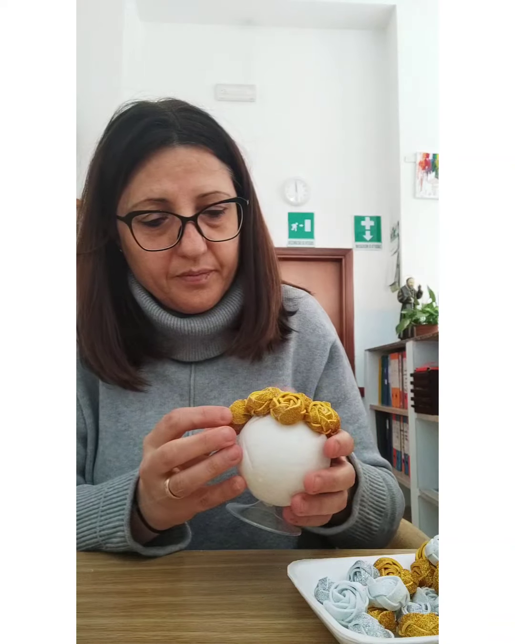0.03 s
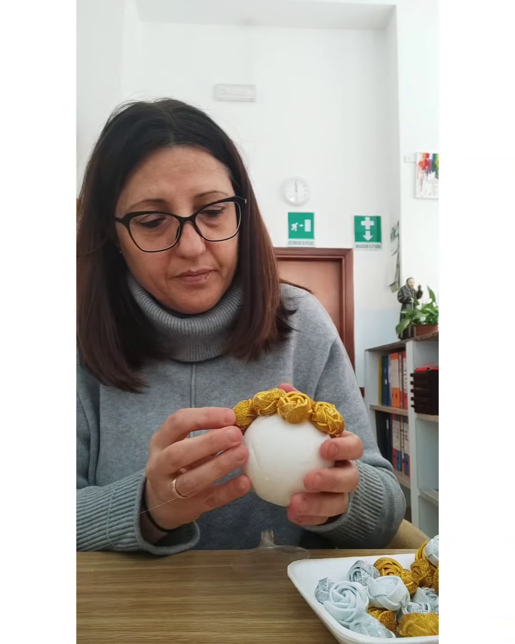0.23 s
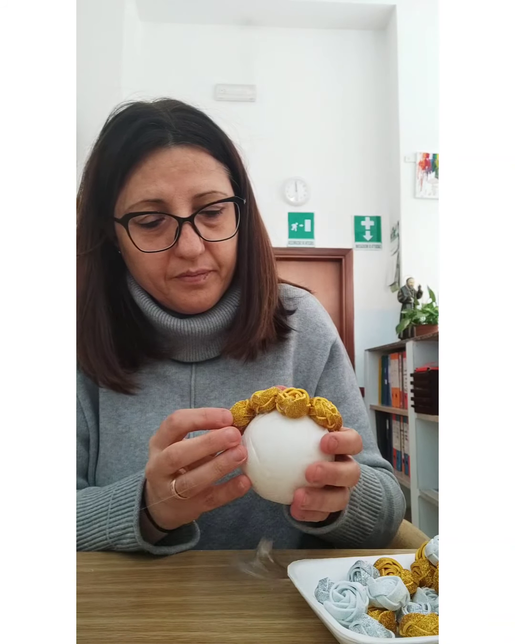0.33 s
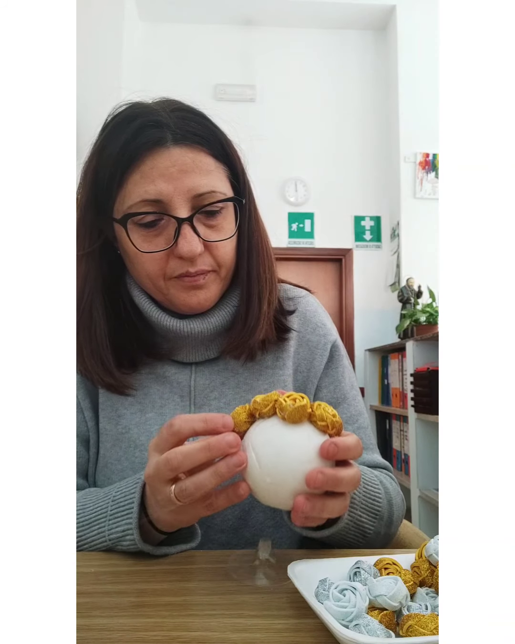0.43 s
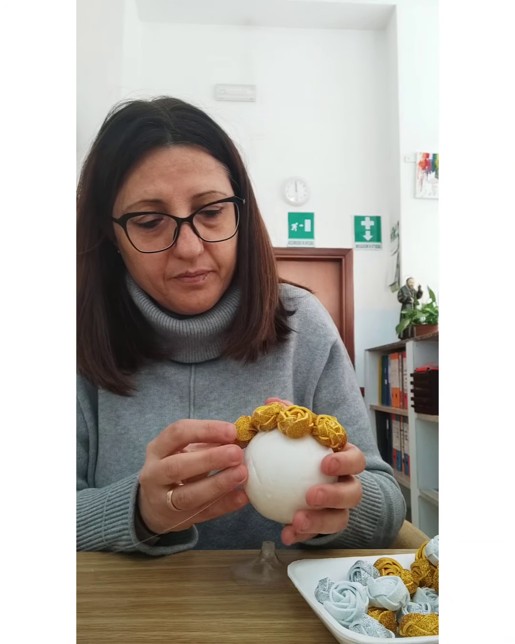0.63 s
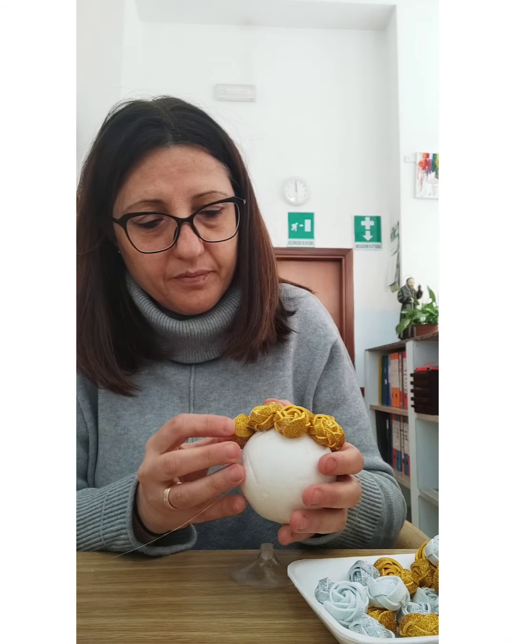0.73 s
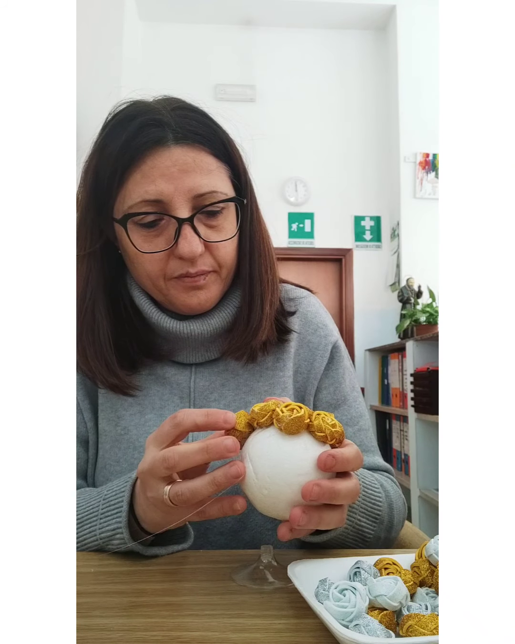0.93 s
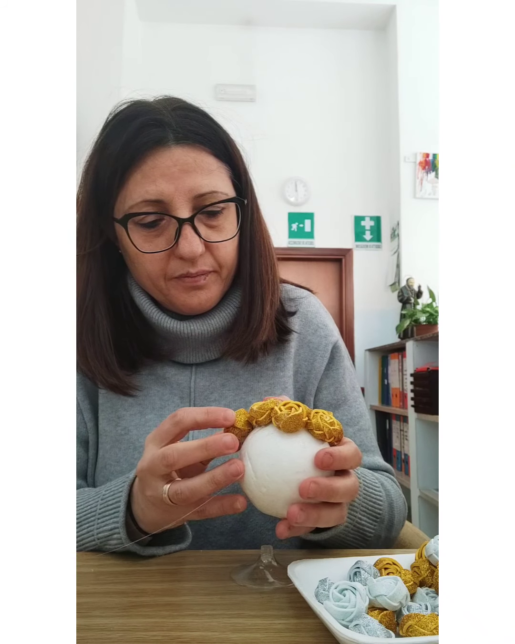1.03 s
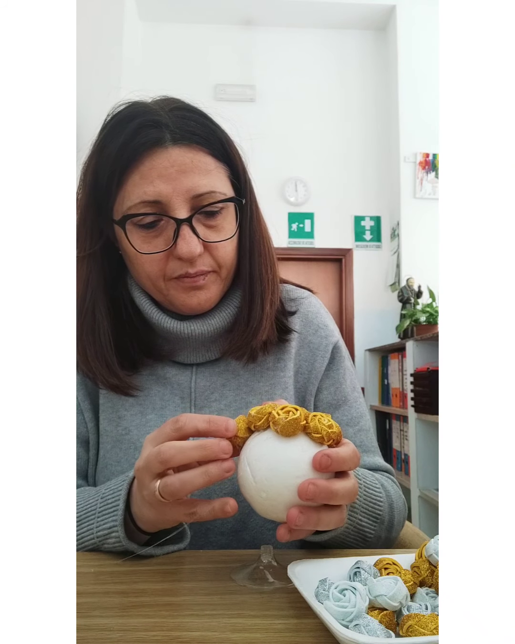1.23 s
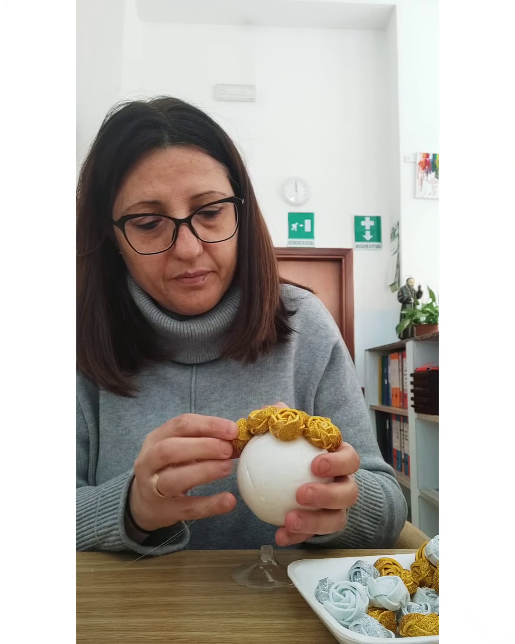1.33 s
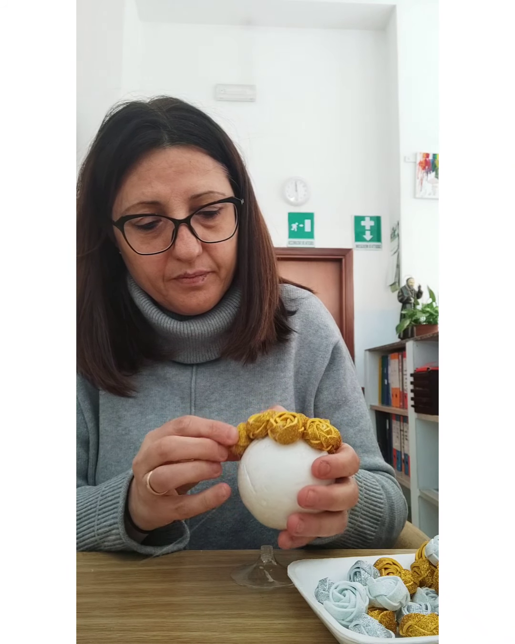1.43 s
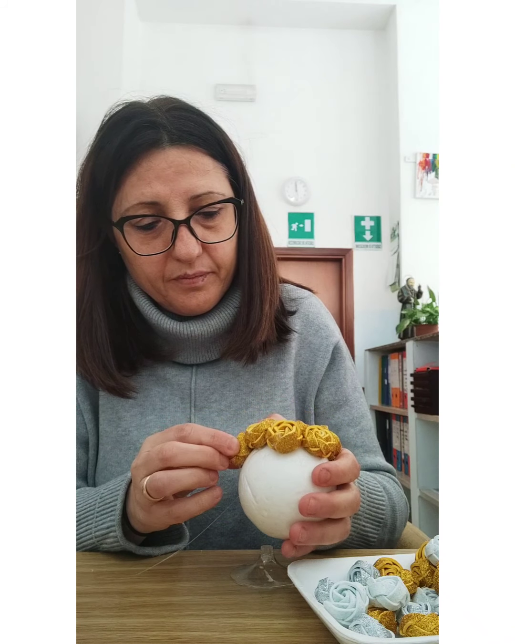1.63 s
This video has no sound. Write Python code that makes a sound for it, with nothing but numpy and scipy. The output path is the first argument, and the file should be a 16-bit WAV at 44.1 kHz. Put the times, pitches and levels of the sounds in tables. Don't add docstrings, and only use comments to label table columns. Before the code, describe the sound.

After barely audible finger strokes, a hard glass-on-wood knock leads into a stuttering, bright scrape with small thumps, ending in a hollow scuff; the echo fades into quiet room air with tiny ticks, heard close up in stereo.

```python
import sys
import numpy as np
from scipy import signal
from scipy.io import wavfile
from scipy.ndimage import uniform_filter1d

SR = 44100
rng = np.random.default_rng(int(sys.argv[2]) if len(sys.argv) > 2 else 0)


def to_wav(s):
    ch = np.atleast_2d(s).T
    pcm = np.round(np.clip(ch, -1, 1) * 32767)
    wavfile.write(sys.argv[1], SR, pcm.astype(np.int16))


def natural_amplitude(level_db):
    exponent = np.asarray(level_db, float) / 20
    return 10 ** exponent


N = 74970

# (time [s], peak [dB], low glass modes [dB], table thud [dB], left-right [dB])
FOOT_KNOCKS = [(.2341, -20, -7, 12.5, 4), (0.2586, -4.5, -25, -2.5, -4), (.2615, -4, -11, -2.5, 0),
               (0.2874, -11.5, -9, -7.5, -9), (.362, -17, -15, -1, -9), (.376, -14, 9, -5.5, 5.5),
               (.383, -11.5, 8.5, -8, -15.5), (0.396, -25, 3.5, -34, -32.5), (0.478, -32, 9, 1, -4),
               (.484, -28.5, 4, 0.5, -12), (.498, -18.5, -27.5, -1, 6.5), (0.5809, -28.5, 9, -4.5, 7),
               (.59, -18, 10, -9, -2.5), (.6259, -18.5, 1.5, -10, 7.5), (0.6646, -18, 7.5, -3, 3.5),
               (0.676, -24, 10.5, -13, 13.5), (0.6888, -14, -10.5, -20, -6), (.703, -25.5, 2.5, -3.5, 2.5),
               (.713, -20, -1, -12.5, 6), (0.718, -17.5, 9.5, -9, 2), (.727, -18.5, 9, 0, 1),
               (0.7332, -11.5, 6, -10, 1.5), (0.7443, -23, 6.5, -15, 9), (0.751, -18.5, 6, 0, 0.5),
               (0.7631, -31, 17, -15.5, 3), (0.77, -21, 10.5, -11, 9), (0.7931, -17.5, -28, -3, 2.5),
               (.825, -17.5, -3, -18, 5), (0.8497, -10, -10, -9, -4.5), (0.8864, -18, -7, -7, 3),
               (0.899, -19.5, 1, -16, 7), (0.911, -15.5, 7.5, -6.5, -3.5), (.917, -17.5, 8, -3, -2.5),
               (0.935, -15.5, 8.5, -10.5, -5.5), (.953, -11.5, -31, -15, 5.5)]
BAND_EDGES = 18 * 2 ** np.arange(0, 10.1, .4)


def stand():
    # (frequency [Hz], width [Hz], depth [dB])
    gaps = [(3640, 240, -40), (4070, 340, -45), (8590, 740, -60), (11100, 240, -35), (12250, 700, -35),
            (14800, 800, -55)]
    slips, rumble, grip = drag()
    out = glass(slips, grip) + scrape(slips, rumble)
    for hz, width_hz, depth_db in gaps:
        out = notch(out, hz, width_hz, depth_db)
    out = out + crack() + table_top(rumble)
    return butter(out, 3, 139, "high")


def drag():
    # (time [s], level [dB], low glass modes [dB])
    pressure = [(0.269, -35, 0), (0.346, -50, 10), (.376, -22.5, 0), (0.387, -29, -1), (.41, -40, 8),
                (0.465, -44.5, 2), (0.484, -31, 8.5), (0.502, -31, 2.5), (0.549, -39, 1), (0.588, -29, 5.5),
                (0.611, -35.5, 7), (.67, -29, -4), (0.731, -34.5, 9), (0.792, -33, 1), (0.893, -31.5, 6.5),
                (.955, -36, 0), (.99, -40, -23), (1.037, -54.5, -10.5)]
    chatter_per_s, chatter_db, sides_alike = 165, 3.5, 0.49
    t = np.arange(N) / SR
    s, press_db, grip_db = np.transpose(pressure)
    press = natural_amplitude(np.interp(t, s, press_db)) * (t > s[0]) * (t < s[-1])
    grip = natural_amplitude(np.interp(t, s, grip_db))
    cycle = np.cumsum(chatter_per_s * (1 + .18 * drift(11.0))) / SR % 1
    left, other = [grains(2700, spread=2.8) for _ in range(2)]
    right = sides_alike * left + np.sqrt(1 - sides_alike ** 2) * other
    slips = press * natural_amplitude(chatter_db * (1 - 2 * cycle)) * np.array([left, right])
    smooth_press = np.abs(uniform_filter1d(press, size=1500))
    rumble_level = np.minimum(natural_amplitude(-31.5), np.sqrt(press * smooth_press))
    return slips, rumble_level * rng.standard_normal(N), grip


def glass(slips, grip):
    # (frequency [Hz], level [dB], t60 [s], left-right [dB])
    glass_modes = [(2273, -2, 0.011, 14.5), (2421, 0.5, 0.013, 11.5), (2530, -2, 0.013, 13.5),
                   (3030, -9.5, 0.03, 8.5), (3331, -18, 0.058, 6), (6308, 0, 0.03, 4),
                   (6750, -8, 0.032, 6.5), (7660, -3.5, 0.0057, -21), (8010, -5.5, .042, 9),
                   (2970, -10.5, 0.045, 10), (10500, -31.5, 0.032, 10), (11856, -30, 0.03, 16),
                   (13800, -24, .005, 16), (16000, -17, .01, 20.5)]
    low_db = np.array(FOOT_KNOCKS)[:, 2]
    luck_db = rng.normal(0, 0.63, (len(FOOT_KNOCKS), len(glass_modes)))
    out = 0
    for k, (hz, db, t60, side_db) in enumerate(glass_modes):
        low_share = 1 if hz < 2800 else 0.64 if 2800 < hz < 4000 else 0
        hits = knock_train(luck_db[:, k] - 7.0 + low_share * low_db)
        rub = 0.098 * slips * natural_amplitude(4 * drift(29.8))
        if hz < 4000:
            rub = rub * grip
        out = out + (-1) ** k * natural_amplitude(db) * pan(side_db) * ring(hits + rub, hz, t60)
    return butter(out, 2, 1700, "high")


def scrape(slips, rumble):
    # (frequency [Hz], level per hertz [dB])
    scrape_colour = [(90, -28.5), (170, 9.5), (320, 6.5), (800, 0.5), (1400, -1.5), (2300, 6), (4700, -4),
                     (7500, 6.5), (9600, -9), (16000, -13)]
    # (frequency [Hz], left-right [dB])
    scrape_balance = [(60, 2.5), (180, 3.5), (550, 17.5), (1650, -2), (4970, 10), (15000, 14)]

    def friction(hz):
        return slips if hz > 1200 else rumble
    return natural_amplitude(1.1) * colour(friction, scrape_colour, scrape_balance, patchy_db=3.0)


def crack():
    # (frequency [Hz], level per hertz [dB])
    crack_colour = [(150, -43.5), (500, -9.5), (1300, 4.5), (2500, 2.5), (5000, 3), (8000, -1),
                    (11000, -20), (16000, -20.5)]
    decay_s = 0.0016
    thud_db = np.array(FOOT_KNOCKS)[:, 3]
    burst = np.exp(-np.arange(2000) / SR / decay_s) * rng.standard_normal(2000)
    bursts = natural_amplitude(-4.5) * signal.fftconvolve(knock_train(thud_db), burst[None])[:, :N]
    balance = [(500, 13.0), (8000, 1.5), (13000, 14)]
    return colour(lambda hz: bursts, crack_colour, balance, patchy_db=2.5)


def table_top(rumble):
    # (frequency [Hz], level [dB], t60 [s])
    wood_modes = [(235, -16, 0.03), (489, -9.5, 0.021), (656, -14.5, 0.025), (882, -9, 0.05),
                  (1150, -6, 0.011), (1403, -6, 0.025), (1871, 0.5, 0.022), (2096, -1, 0.026)]
    lag_s = 0.00509
    thud_db = np.array(FOOT_KNOCKS)[:, 3]
    spot_db = rng.normal(0, 4.3, (len(FOOT_KNOCKS), len(wood_modes)))
    out = 0
    for k, (hz, db, t60) in enumerate(wood_modes):
        force = knock_train(thud_db + spot_db[:, k]) + natural_amplitude(-34) * rumble
        push = signal.lfilter([.06], [1, -.94], force)
        late = np.roll(push, int(lag_s * SR * np.sqrt(300 / hz)), axis=1)
        swell = ring(late, hz, 0.0093) * 0.021
        out = out + pan(3.5) * natural_amplitude(db) * ring(swell, hz, t60)
    return out


def knock_train(extra_db):
    s, db, _, _, side_db = np.transpose(FOOT_KNOCKS)
    out = np.zeros((2, N))
    out[:, (s * SR).astype(int)] = natural_amplitude(db + extra_db) * pan(side_db)
    return out


def tip():
    tip_s, rise_s, fall_s = 0.94, .012, 0.069
    hz, width_hz = 1833, 380
    t = np.arange(N) / SR - tip_s
    shape = np.exp(np.where(t < 0, t / rise_s, -t / fall_s)) * (t < .07)
    scuff = rms_one(ring(grains(4000, spread=0.57), hz, 1.68 / width_hz))
    return pan(10.9) * natural_amplitude(-32.5) * shape * scuff


def fingers():
    # (centre [s], half length [s], level [dB], brightness [dB per octave])
    strokes = [(0.005, 0.03, -61.5, -9.5), (0.077, 0.024, -56, -4), (0.167, 0.05, -52.5, -5),
               (0.187, 0.0046, -69.5, 30), (0.985, 0.035, -43, 5.5), (1.175, 0.025, -60.5, 14),
               (1.263, 0.037, -63.5, -7), (1.394, 0.016, -74.5, 4), (1.491, 0.036, -72.5, 9.5),
               (1.546, 0.026, -70.5, 7.5), (1.65, 0.02, -81, -2.5)]
    # (frequency [Hz], level per hertz [dB])
    rustle_colour = [(900, -41.5), (1500, -17.5), (3000, -13), (4500, -8), (6000, 0), (7900, 5),
                     (10000, -11), (16000, -16.5)]
    # (time [s], peak [dB], frequency [Hz])
    fibre_ticks = [(.0515, -52, 5130), (.0515, -44, 8400), (1.46, -47, 7550), (1.468, -48, 8000),
                   (1.479, -55, 8000), (1.487, -51, 7600), (1.5024, -47, 7750), (1.508, -57.5, 6200),
                   (1.508, -60, 11840), (1.508, -56, 15000), (1.5323, -54.5, 7900), (1.545, -50, 8000),
                   (1.562, -59.5, 7900), (1.6401, -60.5, 7600), (1.653, -61.5, 7680)]
    t = np.arange(N) / SR
    left, other = grains(20000, spread=1.4), grains(9000, spread=3.5)
    grain = np.array([left, 0.4 * left + 1.1 * other])

    def stroked(hz):
        octaves = np.log2(max(hz, 1500) / 8000)
        level = 0
        for s, half_s, db, tilt in strokes:
            level = level + natural_amplitude(db + tilt * octaves) * np.exp(-((t - s) / half_s) ** 2)
        return level * grain

    ticks = 0
    for s, db, hz in fibre_ticks:
        click = natural_amplitude(db - 14) * (np.arange(N) == int(s * SR))
        ticks = ticks + ring(ring(click, hz, 13.0 / hz), hz, 30 / hz)
    balance = [(2000, 7), (8000, 5), (14000, 6)]
    return ticks + 4.4 * colour(stroked, rustle_colour, balance, patchy_db=3.5)


def room(x):
    # (frequency [Hz], t60 [s])
    room_t60 = [(200, 1.3), (1000, 0.97), (2000, 1.393), (3000, 1.17), (6500, 0.84), (12000, 0.54)]
    near_t60_s = 0.033
    t = np.arange(N) / SR
    white = rng.standard_normal((2, N))
    tail = 0
    for low, high in zip(BAND_EDGES[6:], BAND_EDGES[7:]):
        band = butter(white, 2, [low, high], "band")
        tail = tail + band * natural_amplitude(-60 * t / at_hz(room_t60, np.sqrt(low * high)))
    tail = tail * np.clip(t / 0.004, 0, 1) * pan(3.5)
    near = rng.standard_normal((2, N)) * natural_amplitude(-60 * t / near_t60_s) * (t > .001)

    def unit(h):
        return h / np.sqrt(np.sum(h ** 2) / 2)
    far = signal.fftconvolve(x.mean(axis=0, keepdims=True), natural_amplitude(-7) * unit(tail))
    close = signal.fftconvolve(x, natural_amplitude(-6.5) * unit(near), axes=1)
    return far[:, :N] + close[:, :N]


def air():
    # (frequency [Hz], level per hertz [dB])
    air_colour = [(20, 7), (42, -0.5), (100, -10), (300, -15.5), (1000, -22), (3000, -34.5), (8000, -48.5),
                  (16000, -53)]
    # (frequency [Hz], likeness [0 to 1])
    likeness = [(40, .85), (300, 0.9), (2000, .2), (10000, .1)]
    # (frequency [Hz], left-right [dB])
    air_balance = [(60, 4.6), (240, 8), (950, 6), (3770, 3.9), (15000, 4.0)]
    draws = rng.standard_normal((2, 2, N))

    def white(hz):
        mid, side = draws[np.searchsorted(BAND_EDGES, hz) % 2]
        alike = np.clip(at_hz(likeness, hz), 0, 1)
        return np.sqrt(1 + alike) * mid + np.sqrt(1 - alike) * side * [[1], [-1]]
    return natural_amplitude(-49) * rms_one(colour(white, air_colour, air_balance, patchy_db=-0.46))


def rms_one(x):
    return x / np.sqrt(np.mean(x ** 2) + 1e-20)


def at_hz(points, hz):
    curve_hz, value = np.array(points).T
    return np.interp(np.log(hz), np.log(curve_hz), value)


def pan(db):
    return natural_amplitude(np.array([[.5], [-.5]]) * db)


def butter(x, order, hz, kind):
    return signal.sosfilt(signal.butter(order, hz, kind, fs=SR, output="sos"), x)


def drift(rate_hz):
    r = np.exp(-80 * np.pi * rate_hz / SR)
    white = rng.standard_normal(N // 40 + 1002)
    slow = rms_one(signal.lfilter([1], [1, -2 * r, r * r], white)[1000:])
    return np.interp(np.arange(N) / 40, np.arange(len(slow)), slow)


def ring(x, hz, t60):
    r, w = natural_amplitude(-60 / (t60 * SR)), 2 * np.pi * hz / SR
    return signal.lfilter([0, np.sin(w)], [1, -2 * r * np.cos(w), r * r], x + 1e-18)


def notch(x, hz, width_hz, depth_db):
    cut = butter(x, 3, [hz - width_hz / 2, hz + width_hz / 2], "bandstop")
    return cut + natural_amplitude(depth_db) * x


def colour(x, spectrum, balance, patchy_db):
    out = 0
    for low, high in zip(BAND_EDGES, BAND_EDGES[1:]):
        hz = np.sqrt(low * high)
        if hz < .7 * spectrum[0][0]:
            continue
        gain = natural_amplitude(at_hz(spectrum, hz) + patchy_db * drift(10.0)) * pan(at_hz(balance, hz))
        out = out + gain * butter(x(hz) + 1e-18, 2, [low, high], "band")
    return out


def grains(per_s, spread):
    sizes = natural_amplitude(spread * np.minimum(rng.exponential(1, N), 2.6)) * rng.choice([-1, 1], N)
    return rms_one(sizes * (rng.random(N) < per_s / SR))


def scene():
    right_lag = 8
    close = stand() + tip()
    close[1] = np.interp(np.arange(N) - right_lag, np.arange(N), close[1])
    return close + room(close) + fingers() + air()


def band_limit(x):
    return signal.sosfilt(signal.butter(12, 16650, fs=SR, output="sos"), x)


def record(dry):
    x = butter(dry, 2, 26, "high")
    x = signal.sosfilt(signal.cheby2(10, 60, 16700, fs=SR, output="sos"), x)
    return band_limit(x)


dry = scene()
out = record(dry)
to_wav(out)
```